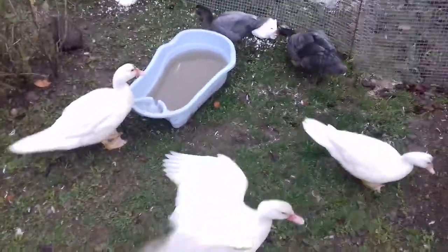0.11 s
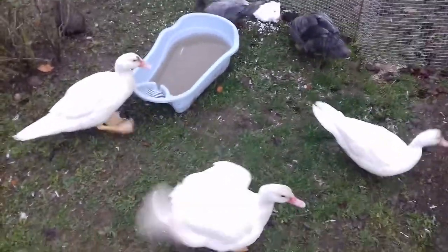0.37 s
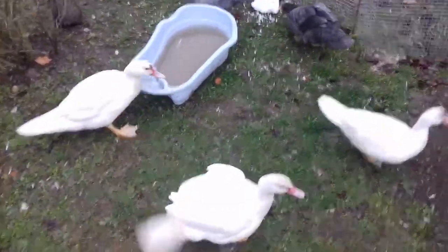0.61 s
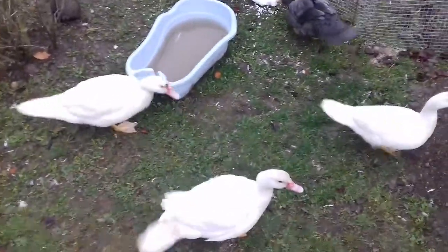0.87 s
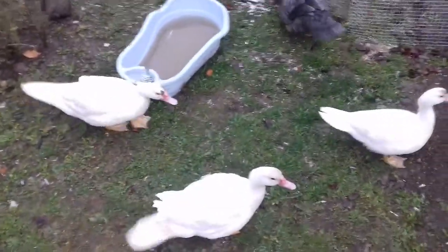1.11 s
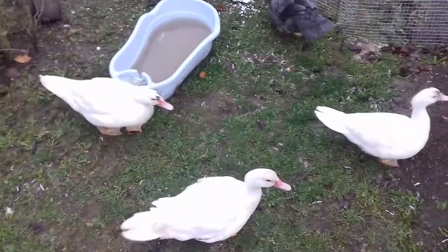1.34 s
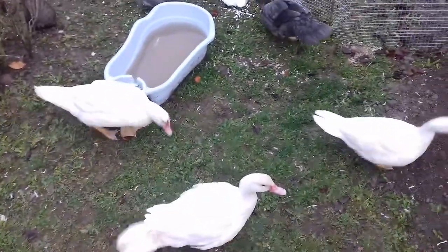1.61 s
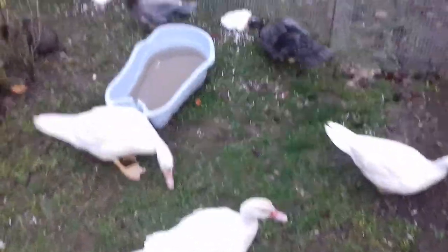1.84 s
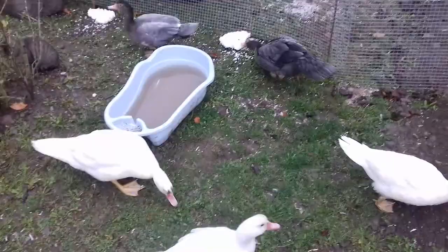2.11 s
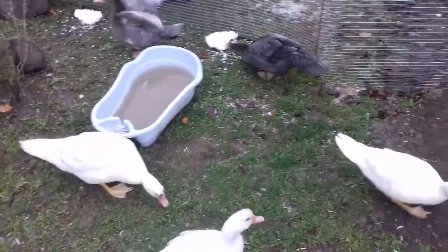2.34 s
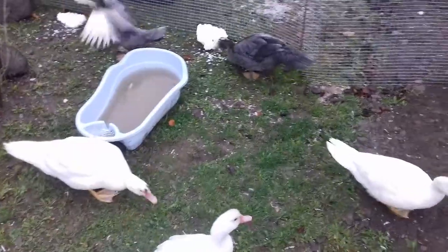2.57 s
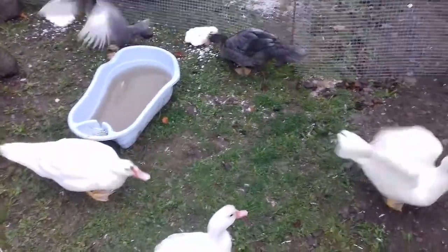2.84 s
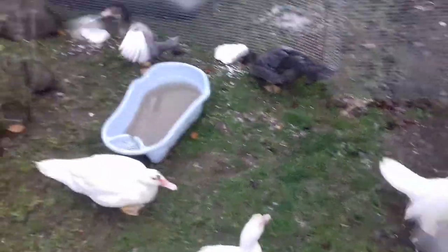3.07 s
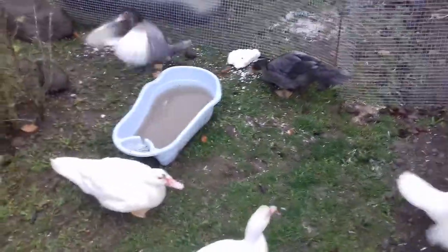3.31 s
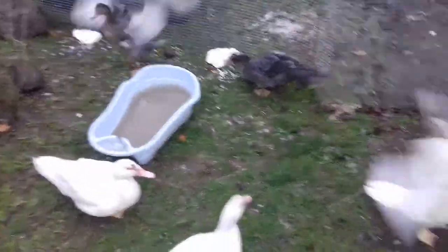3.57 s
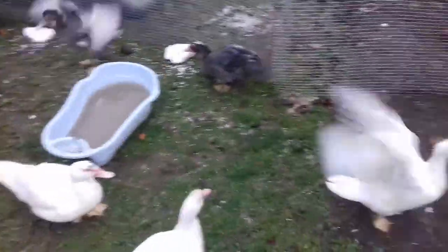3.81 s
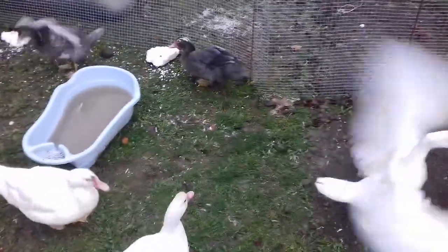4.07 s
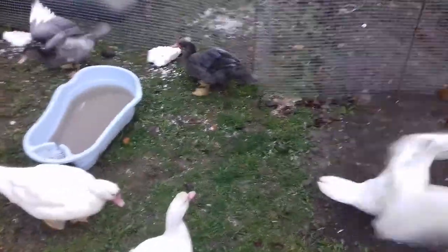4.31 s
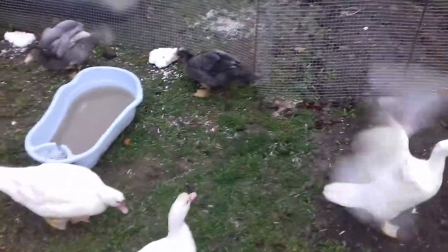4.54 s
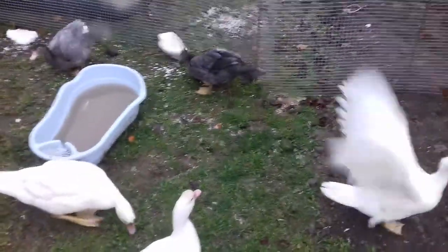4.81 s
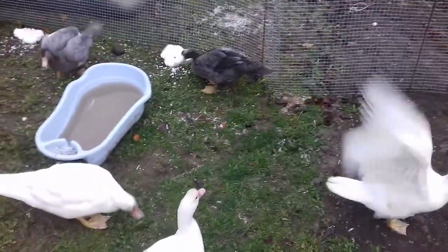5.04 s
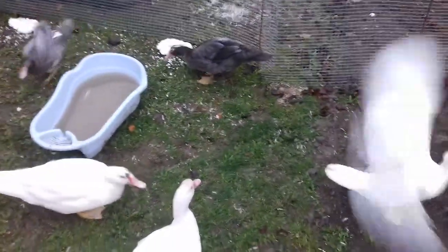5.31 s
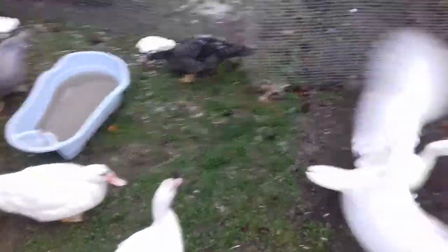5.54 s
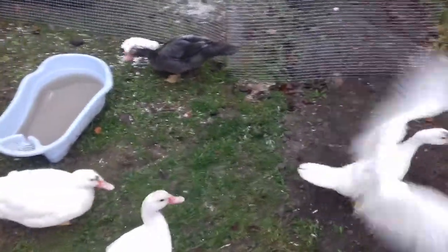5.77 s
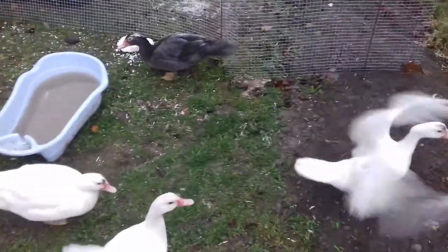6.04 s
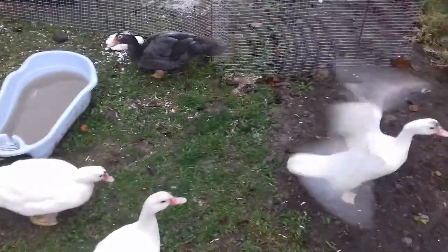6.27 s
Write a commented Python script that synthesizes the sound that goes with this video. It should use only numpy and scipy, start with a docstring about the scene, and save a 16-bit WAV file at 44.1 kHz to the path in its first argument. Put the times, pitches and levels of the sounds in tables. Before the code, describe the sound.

Dry ruffling and sharp quill ticks come in bursts before regular wing beats, about five a second, over faint outdoor wash and hiss.

```python
"""Ducks ruffling and beating wings

Ducks in a grassy run: stiff feathers snap (ticks with hollow rings) and crackle in short flurries
(crowds of short rings). Then one bird beats its wings about five times a second: each stroke is a soft
push of lumpy low noise with a feather swish. Low thumps are flat wing slaps; a faint wash is the yard.
One small, nasal microphone feeds both channels; each channel adds its own faint hiss."""
import sys
import numpy as np
from scipy import signal
from scipy.io import wavfile
from scipy.ndimage import uniform_filter1d

SR = 44100
rng = np.random.default_rng(int(sys.argv[2]) if len(sys.argv) > 2 else 0)


def pcm_store(signal):
    """Save signal as 16-bit PCM."""
    levels = np.round(np.clip(np.atleast_2d(signal), -1, 1) * 32767)
    wavfile.write(sys.argv[1], SR, levels.astype(np.int16).T)


def linear_from_db(decibels):
    """Turn decibels (scalar or array-like) into linear amplitude factors; 0 gives 1."""
    return 10 ** (np.asarray(decibels, float) / 20)


N = 282240


def read(points, hz):
    """A spectrum in dB, interpolated over log frequency."""
    f, db = np.transpose(points)
    return np.interp(np.log(hz + 1), np.log(f + 1), db)


def evened(x):
    """Scales to rms 1."""
    return x / np.sqrt(np.mean(x ** 2) + 1e-20)


def coloured(x, db_at):
    """Causal minimum-phase filter with the gain db_at(hz)."""
    log_gain = np.log(linear_from_db(db_at(abs(np.fft.fftfreq(4096, 1 / SR)))))
    taps = np.fft.ifft(np.exp(np.conj(signal.hilbert(log_gain)))).real[:2048]
    taps = taps.reshape((1,) * (x.ndim - 1) + (-1,))
    return signal.oaconvolve(x, taps, axes=-1)[..., :N]


def coloured_noise(spectrum):
    """Noise of rms 1 with the given spectrum."""
    return evened(coloured(rng.standard_normal(N), lambda hz: read(spectrum, hz)))


def flicker(seconds):
    """Random wobble of rms 1: noise averaged twice over the given time."""
    size = max(round(seconds * SR), 1)
    once = uniform_filter1d(rng.standard_normal(N), size)
    return evened(uniform_filter1d(once, size))


def swells(rows, hold_ms=0):
    """Summed power of swells: (mid-hold s, ms to rise 10 dB, ms to fall 10 dB, peak dB of each layer)."""
    ms = np.arange(N) / SR * 1000
    power = np.zeros((len(rows[0]) - 3, N))
    for s, rise_ms, fall_ms, *levels_db in rows:
        near = slice(max(round((s - .3) * SR), 0), round((s + .3) * SR))
        since_ms = ms[near] - s * 1000
        rising = (since_ms + hold_ms / 2) / max(rise_ms, 2)
        falling = (hold_ms / 2 - since_ms) / max(fall_ms, 2)
        shape_db = 10 * np.minimum(np.minimum(rising, falling), 0)
        power[:, near] += linear_from_db(np.add.outer(levels_db, shape_db)) ** 2
    return power


def grains(low_hz, high_hz, cycles, per_s, spread_db):
    """Barbs letting go: short rings of scattered pitch, most small and a few large; rms 1."""
    size = linear_from_db(spread_db * np.minimum(rng.exponential(1, N), 5)) * (rng.random(N) < per_s / SR)
    kind, out = rng.integers(0, 16, N), np.zeros(N)
    for k, hz in enumerate(np.geomspace(low_hz, high_hz, 16)):
        u = np.arange(round(3 * cycles * SR / hz)) / SR * hz / cycles  # 0 to 3 over the ring
        ring = u * np.exp(-3 * u) * np.sin(2 * np.pi * cycles * u)
        ring = evened(ring - ring.mean()) / np.sqrt(len(u))
        out += signal.oaconvolve(size * (kind == k), ring)[:N]
    return evened(out)


# outdoor wash: (frequency [Hz], relative level [dB])
YARD_SPECTRUM = [(25, -16), (60, -4.5), (140, 6.5), (300, 3.5), (600, 0), (1100, 4), (2000, 2),
                 (3000, -6.5), (4500, -6.5), (7000, -33), (16000, -40)]


def yard():
    """Far, even outdoor wash with a slight swell."""
    level_db, swell_db, swell_s = -61, .4, .15
    return linear_from_db(level_db + swell_db * flicker(swell_s)) * coloured_noise(YARD_SPECTRUM)


# feathers sliding over each other: (time [s], level [dB])
SLIDING = [(0, -60), (.6, -56.5), (.8, -75), (1.1, -61.5), (1.4, -66), (2.1, -86), (2.5, -68), (3.0, -56),
           (3.6, -55), (4.3, -56.5), (5.0, -53.5), (5.6, -61.5), (6.4, -54.5)]
# bursts of ruffling: (peak time [s], rise [ms per 10 dB, at least 2], fall [ms per 10 dB, at least 2],
# body level [dB], hollow level [dB])
RUFFLES = [(0.091, 7, 28, -49.5, -54), (0.119, 19, 46, -52, -63), (0.185, 2, 30, -51.5, -54),
           (0.228, 13, 19, -43, -43.5), (0.26, 24, 24, -48, -47), (0.328, 14, 26, -46.5, -45),
           (0.35, 22, 26, -47, -49), (0.439, 12, 10, -45, -37.5), (0.46, 19, 43, -48, -53),
           (0.568, 15, 23, -41, -44.5), (0.832, 4, 32, -49, -51), (0.893, 18, 10, -38.5, -47),
           (0.92, 18, 50, -48.5, -46), (1.009, 16, 14, -37, -45), (1.023, 8, 5, -35, -48),
           (1.041, 5, 15, -36, -34.5), (1.06, 20, 70, -47.5, -47.5), (2.116, 12, 9, -43, -47.5),
           (2.247, 17, 21, -47.5, -50), (2.291, 5, 14, -27.5, -31), (2.32, -4, 41, -44.5, -42),
           (2.396, -1, 15, -42, -48), (2.438, 7.5, 31, -38, -40.5), (2.475, 36, 34, -42.5, -50),
           (2.51, 30, 36, -42.5, -39.5), (2.546, 11, 12.5, -32, -32), (2.59, 32, 35, -53, -52),
           (2.773, 93, 22, -48.5, -63), (4.463, 12, 18, -51, -36), (4.536, 10, 5, -47, -32),
           (4.787, 7, 14, -35, -33.5), (4.828, 9, 5, -31, -29), (4.857, 16, 6, -50, -40),
           (4.887, 7, 31, -27, -32.5), (4.919, 16, 22, -26.5, -39), (4.943, 25, 2, -26, -32),
           (4.98, 49, 17, -34, -35.5), (5.005, 20, 29, -39, -50), (5.07, 13, 33, -36, -39.5),
           (5.125, 32, 59, -44.5, -48), (5.5, 9, 14, -42.5, -42), (5.637, 0, 15, -41.5, -44),
           (5.697, 9, 8, -42, -37), (5.711, 11, 4, -37.5, -44)]
# body, hollow and treble grains, in swishes too: (lowest pitch [Hz], highest pitch [Hz],
# cycles in a third of a ring, rustle density [1/s], rustle size spread [dB], strength [dB])
BARBS = [(2338, 5620, 7.9, 2200, 2, -8.5), (1160, 2435, 2.9, 1400, 2, -5.5),
         (4490, 13200, 14, 4000, 2.5, 15.5)]


def rustle():
    """Three kinds of barb grain: a low bed of sliding, ruffles and return strokes, in shared clumps."""
    hollow_db, treble_db, ruffle_treble_db = 0.5, -25, -20  # against the body
    clump_db, clump_s = 2.0, 0.011
    bed_db = np.interp(np.arange(N) / SR, *np.transpose(SLIDING))
    bed = linear_from_db(np.add.outer([0, hollow_db, treble_db], bed_db)) ** 2
    ruffles = [(*row, row[3] + ruffle_treble_db) for row in RUFFLES]
    power = bed + swells(return_strokes() + ruffles)
    barbs = np.array([linear_from_db(db) * grains(*kind) for *kind, db in BARBS])
    return linear_from_db(clump_db * flicker(clump_s)) * (np.sqrt(power) * barbs).sum(0)


# flat wing slaps: (time [s], envelope peak [dB], pitch [Hz])
SLAPS = [(0.081, -56, 408), (0.225, -61, 256), (0.329, -58, 370), (0.438, -59, 420), (1.025, -48.5, 229),
         (2.437, -54, 207), (2.544, -53.5, 220), (4.16, -46.5, 310), (4.48, -41.5, 243),
         (4.531, -35.5, 277), (4.783, -47, 680), (4.822, -54.5, 655), (4.876, -44.5, 820),
         (4.946, -47.5, 256), (5.07, -54, 500), (5.114, -59, 438), (5.628, -49.5, 263), (5.79, -48, 197),
         (6.269, -52, 232)]


def slaps():
    """A few cycles of low thump as trapped air is squeezed out."""
    rise_s = 0.0049
    out = np.zeros(N + 2000)
    t = np.arange(2000) / SR
    for s, peak_db, hz in SLAPS:
        u = t / rise_s
        thump = u * np.exp(1 - u) * np.sin(2 * np.pi * hz * t)
        out[round(s * SR):][:2000] += linear_from_db(peak_db) * thump
    return out[:N]


# quills snapping, levels before colouring: (time [s], tick level [dB], hollow ring pitch [Hz],
# hollow ring level [dB], treble level [dB])
SNAPS = [(0.087, -30, 1630, -29.5, -56), (0.105, -45, 1500, -50, -52), (0.1878, -47, 1590, -37.5, -64),
         (0.2285, -10, 1470, -22.5, -38), (0.2347, -41, 1450, -26.5, -61), (0.3207, -40, 1400, -37, -67),
         (0.331, -32, 1470, -29.5, -51), (0.3473, -35, 1360, -51, -46.5), (0.435, -27, 1580, -28, -52),
         (0.459, -42, 1390, -50, -52), (0.5454, -48, 2300, -28, -63), (0.615, -39, 2030, -54, -70),
         (0.8266, -33, 1700, -31, -51), (0.8664, -29, 1810, -32, -62), (0.8902, -14, 1970, -23.5, -41.5),
         (1.0042, -27, 1770, -31, -50), (1.0234, -5, 1570, -16, -34.5), (1.0357, -20, 2300, -21, -39),
         (1.041, -18, 1590, -24.5, -51), (2.1051, -31, 1460, -35.5, -56), (2.2858, -10.5, 2330, -29, -50),
         (2.2955, -11.5, 1950, -21, -42), (2.3148, -18.5, 1890, -26, -47), (2.3935, -25.5, 1290, -53, -53),
         (2.4309, -19, 1690, -32, -41), (2.4987, -23, 1760, -27, -46), (2.5118, -20, 1520, -31, -47),
         (2.5232, -22, 1590, -27, -47), (2.5312, -21, 1920, -31, -46), (2.5425, -10, 1860, -36, -35),
         (2.5496, -15.5, 1900, -32, -37.5), (2.643, -44, 1350, -43, -59), (2.734, -34, 1210, -54, -59),
         (2.8459, -21, 2490, -54, -49.5), (2.9666, -51, 1220, -35.5, -75), (3.1566, -25, 1540, -37, -56),
         (3.4466, -30.5, 1200, -32, -57), (3.5788, -25, 1700, -54, -68), (3.6049, -23.5, 1630, -35.5, -54),
         (3.879, -49, 1310, -29.5, -68), (3.978, -45, 1500, -50, -51), (4.2357, -38, 1900, -37.5, -64),
         (4.3007, -36, 1280, -28, -70), (4.4914, -19, 1390, -26.5, -67), (4.716, -33, 1500, -47, -52),
         (4.726, -34, 1500, -45, -51), (4.7654, -26, 1480, -40, -65), (4.7704, -34, 1310, -28.5, -57),
         (4.7828, -17.5, 1280, -25, -40), (4.8224, -23, 1820, -28.5, -32.5), (4.846, -45, 1850, -30, -70),
         (4.857, -45, 1950, -28, -70), (4.8736, -31, 1650, -31, -41), (4.883, -14, 1500, -28, -45),
         (4.916, -15, 1630, -23, -31), (4.9213, -21, 2280, -24, -27.5), (4.9368, -15, 1820, -29, -43),
         (4.9459, 2.5, 2400, -40, -31), (4.966, -22, 1600, -26, -57), (5.0595, -21, 2320, -44, -41),
         (5.0718, -22.5, 1430, -33, -39), (5.1133, -30, 1120, -42, -40), (5.276, -32, 1700, -48, -57),
         (5.314, -29.5, 2110, -50, -58), (5.3584, -22, 1840, -55, -65), (5.3974, -28.5, 1460, -30, -66),
         (5.4663, -22.5, 1650, -43, -51), (5.4963, -23.5, 2040, -31, -53), (5.6366, -24, 1930, -31, -60),
         (5.6943, -41, 1910, -37, -64), (5.7057, -23, 1870, -52, -66), (5.913, -33, 1700, -48, -66),
         (6.149, -38, 1580, -32, -73), (6.217, -27, 2150, -32, -65), (6.2314, -32, 1270, -30, -67),
         (6.337, -38, 2100, -38, -68)]
# colours of the snap's three layers: (frequency [Hz], gain [dB])
BODY_GAIN = [(100, -10), (500, -4.5), (1000, -11), (1500, -8), (2500, 6), (4000, 8.5), (5500, 10),
             (8000, -24), (16000, -52)]
TREBLE_GAIN = [(2000, -3), (5000, 20), (7000, 36), (10000, 36), (16000, 21)]
HOLLOW_GAIN = [(100, -74), (600, -52), (1000, -6.5), (1500, -2.5), (2000, -2.5), (2800, -10.5),
               (16000, -65)]


def snaps():
    """A sharp tick, a short hollow ring and a dying spray of smaller ticks."""
    lag_s, spray_t60_s, ring_t60_s = 0.00067, 0.026, 0.0097
    fizz_rise_s, fizz_t60_s = 0.0013, 0.019
    body, treble, hollow = np.zeros((3, N + 4000))
    t = np.arange(4000) / SR
    chance, sign = rng.random((len(SNAPS), 2, 4000)).transpose(1, 0, 2)
    tearing = 0.15 * rng.standard_normal((len(SNAPS), 4000))  # barbs tearing apart
    fizz = tearing * (1 - np.exp(-t / fizz_rise_s)) * linear_from_db(-60 * t / fizz_t60_s)
    for k, (s, tick_db, hz, ring_db, treble_db) in enumerate(SNAPS):
        spray = 0.48 * (chance[k] < .05) * (2 * sign[k] - 1) * linear_from_db(-60 * t / spray_t60_s)
        spray[0] = 1  # the tick itself
        ring = np.sin(2 * np.pi * hz * t[:600]) * linear_from_db(-60 * t[:600] / ring_t60_s)
        at = round((s + lag_s) * SR)
        body[at:at + 4000] += linear_from_db(tick_db) * spray
        treble[at:at + 4000] += linear_from_db(treble_db) * (0.55 * spray + fizz[k])
        hollow[at:at + 4000] += linear_from_db(ring_db) * signal.fftconvolve(spray, ring)[:4000]
    layers = (body, BODY_GAIN), (treble, TREBLE_GAIN), (hollow, HOLLOW_GAIN)
    return sum(coloured(x[:N], lambda hz: read(gain, hz)) for x, gain in layers)


# wing beats, for all three stroke sounds: (time [s], air level [dB], swish level [dB],
# return stroke level [dB]); feather levels before grain strength
BEATS = [(2.846, -66, -49.5, -68), (3.065, -60, -53, -50), (3.297, -56.5, -48, -47.5),
         (3.507, -55, -43, -47.5), (3.723, -51.5, -43.5, -52), (3.924, -51, -45.5, -52.5),
         (4.118, -51.5, -44, -53), (4.311, -47, -43, -53), (4.518, -46, -40, -50.5),
         (4.709, -52, -44.5, -58), (4.95, -56.5, -40, -58), (5.11, -53.5, -48.5, -52),
         (5.386, -55.5, -47.5, -51), (5.593, -51.5, -48, -55), (5.782, -50.5, -45, -53),
         (6.0, -53, -47.5, -59), (6.222, -52.5, -50, -59), (6.4, -52.5, -54, -58)]


def swishes():
    """The spread feathers rushing through the air on each beat: a denser, more even crowd of grains."""
    rise_ms, fall_ms, hold_ms = 17.6, 43.5, 15.7  # rise and fall per 10 dB
    hollow_db, treble_db = -1.5, -24  # against the body
    per_s, spread_db, clump_db, clump_s = 4000, 1.04, 1.8, 0.007
    down = [(s, rise_ms, fall_ms, db, db + hollow_db, db + treble_db) for s, _, db, _ in BEATS]
    barbs = np.array([linear_from_db(db) * grains(low_hz, high_hz, cycles, per_s, spread_db)
                      for low_hz, high_hz, cycles, _, _, db in BARBS])
    return linear_from_db(clump_db * flicker(clump_s)) * (np.sqrt(swells(down, hold_ms)) * barbs).sum(0)


# turbulence: (frequency [Hz], relative level [dB])
AIR_SPECTRUM = [(40, -18), (100, -8), (180, -2.5), (280, -0.5), (500, -3.5), (900, -6.5), (2000, -11.5),
                (5000, -25.5), (16000, -46)]


def strokes():
    """Lumpy turbulence shed by the wing, mostly low: one push just after each beat."""
    lag_s, hold_ms, rise_ms, fall_ms = 0.015, 23, 74, 68  # rise and fall per 10 dB
    lump_db, lump_s = 2.6, 0.013
    air = coloured_noise(AIR_SPECTRUM)
    push = swells([(s + lag_s, rise_ms, fall_ms, db) for s, db, _, _ in BEATS], hold_ms)[0]
    return np.sqrt(push) * linear_from_db(lump_db * flicker(lump_s)) * air


def return_strokes():
    """Swells of feather rustle as the wing returns after each beat, as rows for swells()."""
    lag_s, rise_ms, fall_ms = 0.11, 57, 45  # rise and fall per 10 dB
    hollow_db, treble_db = -5.5, -20.5  # against the body
    return [(s + lag_s, rise_ms, fall_ms, db, db + hollow_db, db + treble_db) for s, _, _, db in BEATS]


def scene():
    """All sources reach the one microphone, which feeds both channels."""
    mono = yard() + rustle() + slaps() + snaps() + swishes() + strokes()
    return np.tile(mono, (2, 1))


def roll_off(x):
    """The treble ends steeply here."""
    return signal.sosfilt(signal.butter(12, 16480, fs=SR, output="sos"), x)


# nasal capsule: (frequency [Hz], gain [dB])
MICROPHONE_GAIN = [(20, -5), (2600, 2.5), (3200, 8), (3700, 12), (4200, 5.5), (4700, -6.5), (5200, -13),
                   (6000, -12), (8500, -16), (16000, -21)]
# hiss: (frequency [Hz], relative level [dB])
HISS_SPECTRUM = [(20, -19), (50, -4), (100, 3), (400, 3.5), (2500, -1), (3500, -9.5), (5000, -10.5),
                 (9000, -10.5), (16000, -10)]
# narrow treble dips: (centre [Hz], width [Hz], gain [dB])
TREBLE_DIPS = [(10000, 500, -8), (15000, 300, -8)]


def record(dry):
    """Nasal capsule, own hiss in each channel, two treble dips, a steep treble limit, a small offset."""
    hiss_db, edge_hz, offset = -66, 15830, -.0006
    capsule = coloured(dry, lambda hz: read(MICROPHONE_GAIN, hz))
    noise = coloured(rng.standard_normal((2, N)), lambda hz: read(HISS_SPECTRUM, hz))
    hissy = capsule + linear_from_db(hiss_db) * evened(noise)
    dipped = coloured(hissy, lambda hz: sum(db * np.exp(-((hz - f) / width) ** 2)
                                            for f, width, db in TREBLE_DIPS))
    edge = signal.firwin(511, edge_hz, window=("kaiser", 9), fs=SR)
    mix = signal.oaconvolve(dipped, edge[None], "same") + offset
    return roll_off(mix)


dry = scene()
out = record(dry)
pcm_store(out)
```